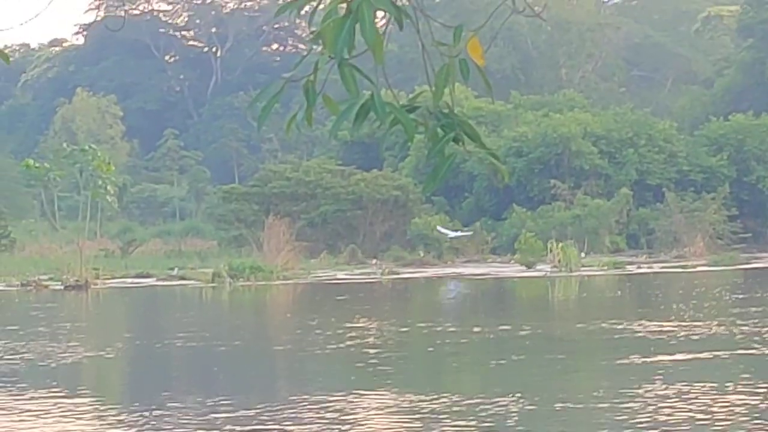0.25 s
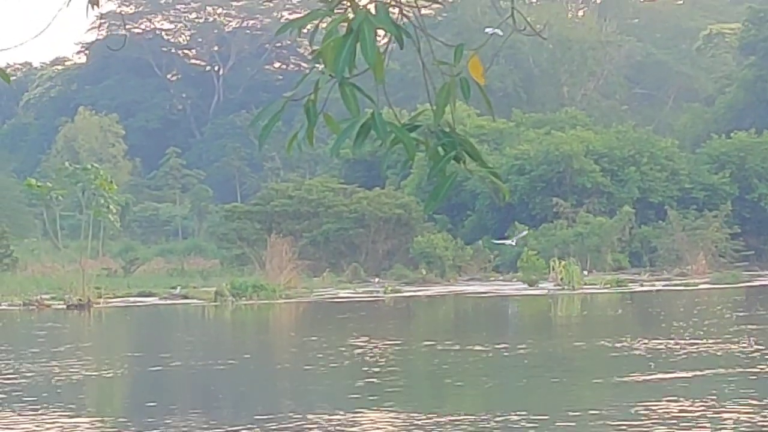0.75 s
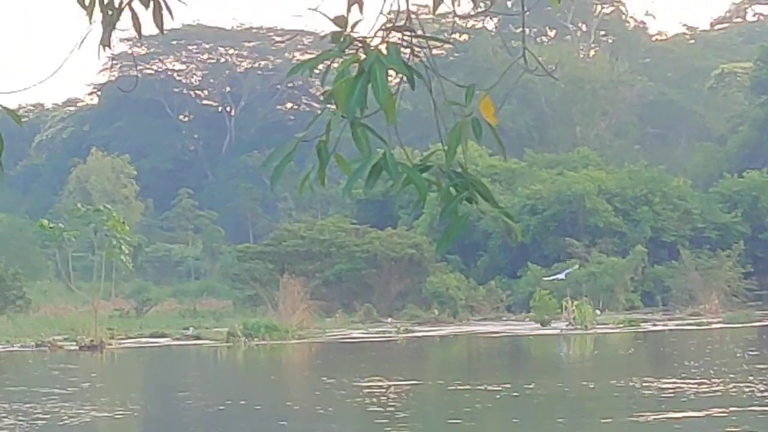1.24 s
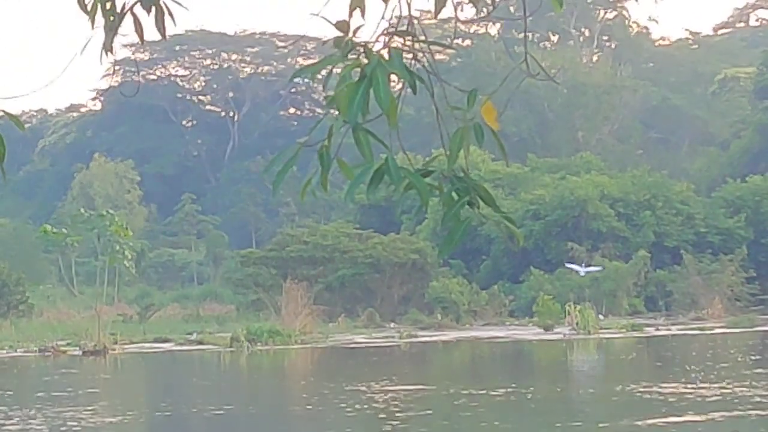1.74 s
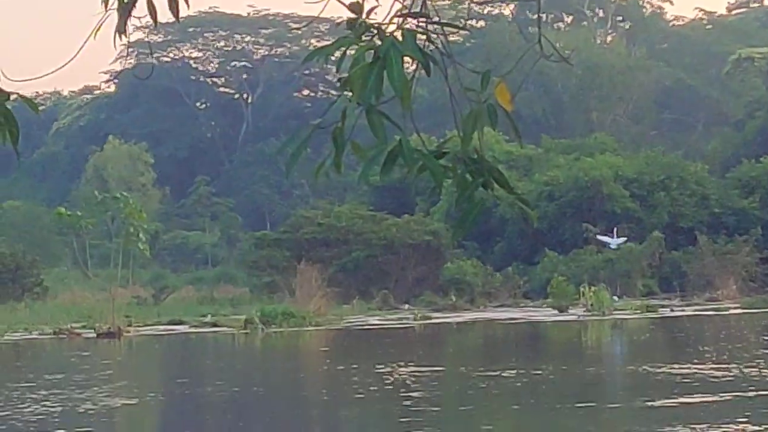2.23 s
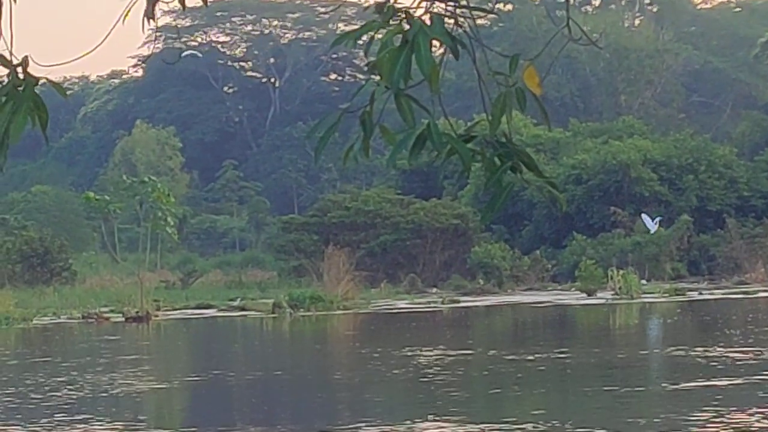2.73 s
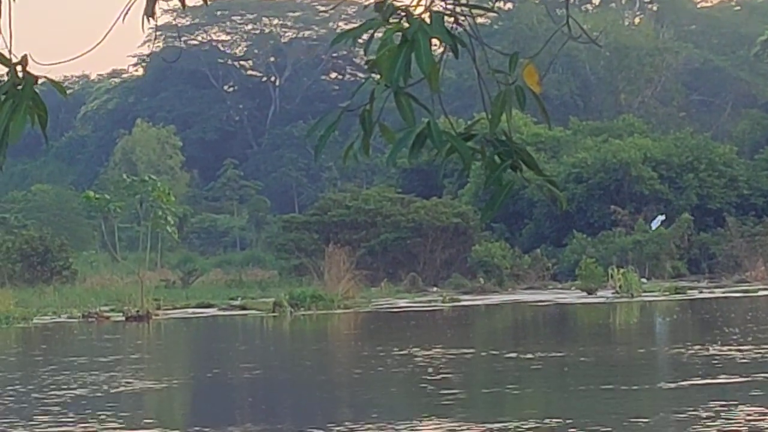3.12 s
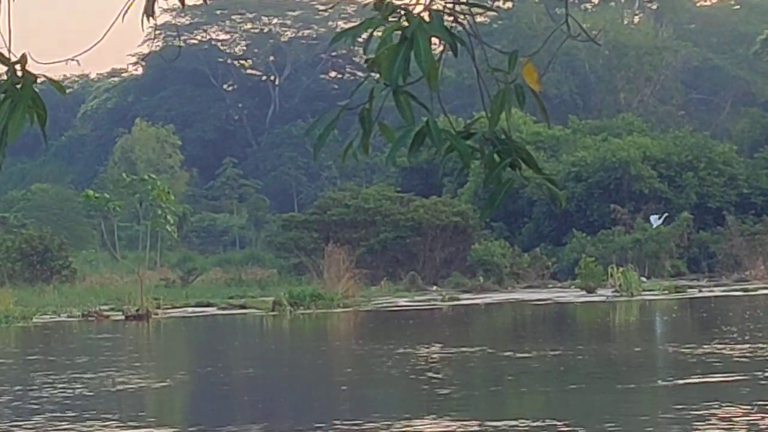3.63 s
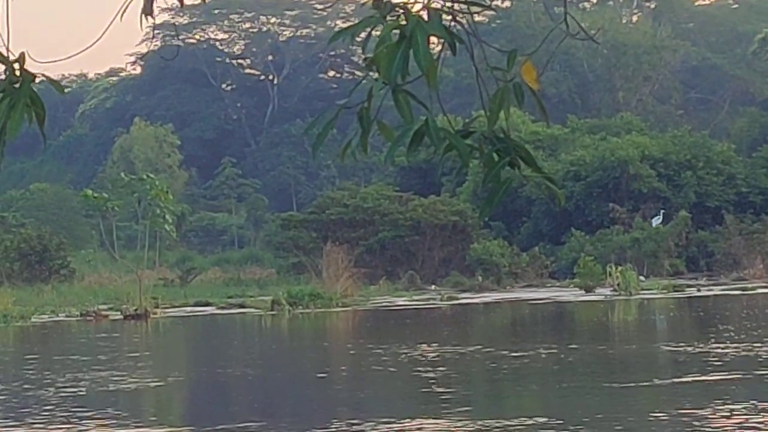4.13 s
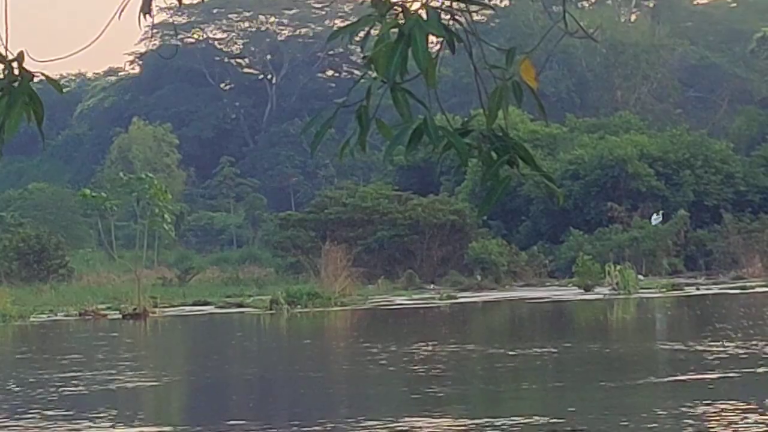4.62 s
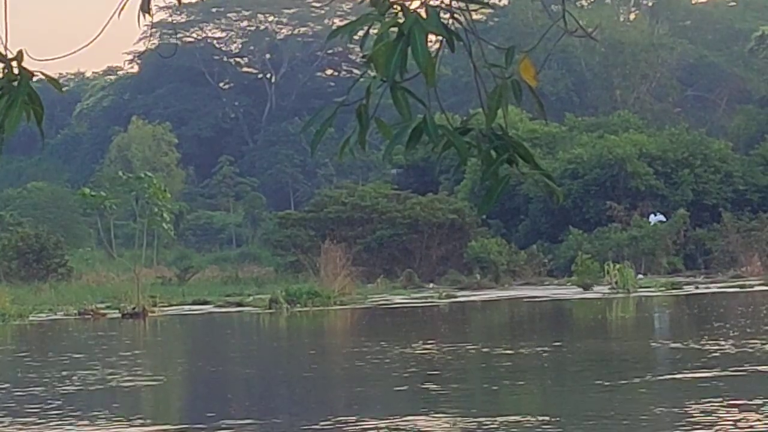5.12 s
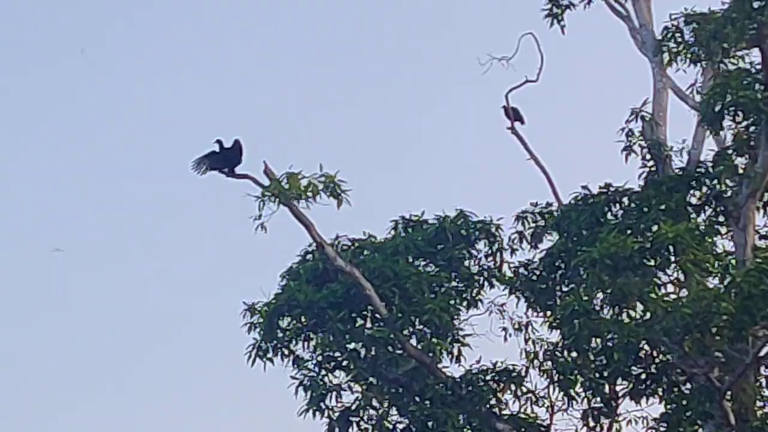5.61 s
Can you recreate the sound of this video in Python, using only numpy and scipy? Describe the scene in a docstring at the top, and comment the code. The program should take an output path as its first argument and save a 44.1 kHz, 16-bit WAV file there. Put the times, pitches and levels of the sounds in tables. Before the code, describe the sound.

Broad, steady river rush with a low rumble fills the stereo picture, under a continuous shrill insect drone. Small birds chip and slur; two clear, long whistles come around two seconds, then a larger bird slurs upward and gives a reedy cry near four. The handheld microphone shifts with a faint rustle midway. Open forested riverbank with lingering echoes; sound cuts off just before the end.

```python
"""A flooded river rushes steadily past a forested bank, with insects droning in the trees. Birds whistle
and chip near and far. Water, insects, hum, chatter and rustle are filtered noise; the other bird calls
are gliding tones, hoots and plops nearly steady ones, all followed by scattered echoes. The microphone
shifts once with a rustle, and its two ports colour the treble differently. The sound cuts to silence
shortly before the end."""
import sys
import numpy as np
from scipy import signal
from scipy.fft import rfft, irfft
from scipy.io import wavfile
from scipy.ndimage import uniform_filter1d, map_coordinates

SR = 44100
rng = np.random.default_rng(int(sys.argv[2]) if len(sys.argv) > 2 else 0)


def transcribe(u):
    """Save the signal u as a 16-bit wav file named by the first command-line argument.

    u: samples, shape (n,) or (channels, n), limited to [-1, 1]; the rate is SR.
    q: integer samples, one column per channel.
    """
    v = np.clip(np.atleast_2d(u).T, -1, 1)
    q = np.round(v * 32767).astype(np.int16)
    wavfile.write(sys.argv[1], SR, q)


N = 258420


def gain_of(db):
    """Amplitude ratio of a level: 20 dB for each factor of ten."""
    return 10 ** (np.asarray(db) / 20)


def evened(x):
    """Normalization to unit root mean square."""
    return x / np.sqrt(np.mean(x ** 2) + 1e-20)


def read(points, hz):
    """Interpolation of a spectrum by straight lines over log frequency."""
    f, value = np.transpose(points)
    return np.interp(np.log(hz + 1), np.log(f + 1), value)


def add(mix, s, sound):
    """Superposition: a sound is summed into the mix from s seconds on."""
    part = mix[round(s * SR):][:len(sound)]
    part += sound[:len(part)]


def white(size=1024):
    """Short-time spectra of two uncorrelated white noises, 0 dB per Hz: f/Hz (column), t/s, spectra."""
    noise = rng.standard_normal((2, N)) * np.sqrt(SR / 2)
    hz, t, z = signal.stft(noise, SR, nperseg=size, noverlap=size - size // 4)
    return hz[:, None], t, z


def sounded(z, size=1024):
    """Overlap-add synthesis: short-time spectra back to sound."""
    return signal.istft(z, nperseg=size, noverlap=size - size // 4)[1][:, :N]


def patches(shape, size):
    """Smoothed random field: blotches of unit size over frequency and time."""
    over_hz = uniform_filter1d(rng.standard_normal(shape), size, 0)
    return evened(uniform_filter1d(over_hz, size, 1))


def wander(n, hz):
    """Band-limited chance: a smooth curve through hz random knots per second, of about unit size."""
    knots = rng.standard_normal(256)
    return map_coordinates(knots, [np.arange(n) * hz / SR], order=3, mode="mirror")


def envelope(t, attack_s, hold_s, fade_db_per_s):
    """Linear rise from t = 0, a hold until hold_s, then exponential decay."""
    fade = gain_of(-fade_db_per_s * np.maximum(t - hold_s, 0))
    return np.clip(t / attack_s, 0, 1) * fade


def whistle(length, pitches, overtones, waver=.003, shake_db=2.0, soft=0.18):
    """Frequency modulation: a tone passes through three pitches; pitch and level tremble at random."""
    n = int(length * SR)
    bend = np.polyfit([0, .5, 1], pitches, 2)
    hz = np.polyval(bend, np.linspace(0, 1, n)) * (1 + waver * wander(n, hz=170))
    phase = 2 * np.pi * np.cumsum(hz) / SR
    tone = sum(gain_of(db) * np.sin(round(k) * phase) for k, db in overtones)
    shake = gain_of(shake_db * wander(n, hz=59.3))
    return np.sqrt(2) * tone * signal.windows.tukey(n, soft) * shake


def forest(x, t60, wet_db, lead_ms):
    """Scattering: direct sound, then sparse echoes from trunks and leaves that lose 60 dB in t60 seconds."""
    t = np.arange(SR) / SR
    taps = rng.standard_normal((2, SR)) * (rng.random((2, SR)) < 2000 / SR)  # 2000 echoes per second
    tail = taps * gain_of(-60 * t / t60) * (1 - np.exp(-t / 0.0066))
    tail /= np.linalg.norm(tail, axis=1, keepdims=True)
    direct = np.array([x, np.roll(x, round(lead_ms * SR / 1000))])  # left port leads
    echoes = signal.fftconvolve(x[None], tail, axes=1)[:, :N]
    wet = gain_of(wet_db)
    return (direct + wet * echoes) / np.sqrt(1 + wet ** 2)


def shifted(t):
    """Linear displacement of the microphone, from 0 to 1, at the times t."""
    shift_s, shift_takes_s = 3.44, 0.28  # middle and duration of the shift
    return np.clip(.5 + (t - shift_s) / shift_takes_s, 0, 1)


def facing(t):
    """Linear interpolation between the microphone's two orientations: each column at the times t."""
    # water before and after the shift: rumble level/dB, rush level/dB, lead of the left port/ms,
    # factor on the likeness of the ports
    orientations = [(-0.5, -0.63, 0.44, 0.89), (-1.65, 0.02, 0.4, 1.106)]
    before, after = np.array(orientations)
    return before[:, None] + (after - before)[:, None] * shifted(t)


def water(patchy_db=1.0, surge_db=0.93, rumble_hz=450):
    """Partly coherent noise: countless splashes merge to rush and rumble, reaching the left port first."""
    # base spectrum of the water: f/Hz, density/(dB per Hz)
    spectrum = [(10, -71), (35, -72), (80, -72.5), (200, -78), (360, -77.5), (650, -82.5), (1000, -82.5),
                (2000, -86.5), (2700, -91.5), (3050, -94.5), (3600, -93), (4300, -92), (5250, -100),
                (7400, -96.5), (9200, -109.5), (15000, -109)]
    # base coherence of the two ports: f/Hz, likeness (0-1)
    likeness = [(20, 0.5), (110, 0.99), (300, 0.96), (600, 0.68), (1200, 0.76), (2100, 0.64), (3000, 0.6),
                (4000, 0.3), (15000, 0.4)]
    ebb_db_per_s = 0.35  # the water slowly grows quieter
    hz, t, (left, other) = white()
    rumble_db, rush_db, lead_ms, focus = facing(t)
    low = 1 / (1 + (hz / rumble_hz) ** 2)  # share of the rumble; the rest is rush
    high = 1 - low

    same = np.clip(read(likeness, hz) * (low + high * focus), 0, 1)
    delay = np.exp(-2j * np.pi * hz * lead_ms / 1000)
    right = same * left * delay + np.sqrt(1 - same ** 2) * other

    surge = evened(uniform_filter1d(rng.standard_normal(len(t)), size=16))
    db = read(spectrum, hz) + low * rumble_db + high * rush_db
    db = db - ebb_db_per_s * (t - t.mean()) + surge_db * surge
    db = db + high * patchy_db * patches(left.shape, size=12)
    return sounded(np.array([left, right]) * gain_of(db))


def songbirds():
    """Pure gliding tones: short whistles and slurs that slide quickly at first, then settle."""
    # thin notes: t/s, length/s, first f/Hz, last f/Hz, relative level/dB at the first pitch
    notes = [ (0.293, .039, 5290, 5290, -47), (1.0, 0.053, 1532, 1765, -60),
             (1.085, 0.066, 5540, 5200, -51.5), (1.138, 0.1, 5100, 2554, -51.5),
             (1.52, .07, 8200, 7850, -64), (1.618, .06, 7590, 7140, -57), (1.668, 0.077, 4420, 3880, -56.5),
             (1.732, 0.062, 1380, 2155, -58.5), (1.785, .22, 2694, 2630, -59.5),
             (2.008, .11, 3220, 2590, -58.5), (2.051, 0.089, 2490, 2200, -62),
             (2.104, 0.081, 2600, 1950, -55), (3.04, 0.068, 1850, 2125, -60),
             (3.058, 0.11, 5360, 5350, -61), (3.069, 0.08, 4600, 4100, -60),
             (3.12, 0.093, 1416, 1886, -63.5), (3.172, 0.39, 3740, 3716, -68.5),
             (5.055, 0.1, 7870, 7630, -62), (5.153, 0.0595, 7370, 6910, -45.5),
             (5.2, 0.053, 7000, 6330, -50.5)]
    ease = .6  # share of its slide that a note has covered at half its length
    db_per_octave = 5  # a note grows as it rises and fades as it falls
    out = np.zeros(N)
    for s, length, first, last, db in notes:
        middle = first + ease * (last - first)
        waver = 0.0014 + 0.03 * abs(np.log(last / first))  # wide slurs are rougher than held notes
        note = whistle(length, (first, middle, last), [(1, 0)], waver=waver, shake_db=2.5, soft=0.27)
        octaves = np.linspace(0, np.log2(last / first), len(note))
        add(out, s, note * gain_of(db + db_per_octave * octaves))
    return gain_of(0.3) * forest(out, t60=1.3, wet_db=-2.0, lead_ms=.07)


def piper(level_db=-1.3, octave_db=-21, waver=0.0042, shake_db=1.4):
    """Exponential glide: long whistles swell as they scoop up, then sag and fade among lingering echoes."""
    # pipes: t/s, swell/s, hold/s, fade/(dB per s), top f/Hz, scoop depth/Hz, scoop time constant/s,
    # relative level/dB
    pipes = [(1.805, .05, 0.19, 65.5, 4169, 231.7, .1, -47), (2.388, 0.035, 0.2, 42, 4062, 229, .02, -48.5)]
    sag_hz_per_s = 50
    out, t = np.zeros(N), np.arange(SR) / SR
    for s, swell, hold, fade, top_hz, scoop_hz, scoop_s, db in pipes:
        hz = top_hz - scoop_hz * np.exp(-t / scoop_s) - sag_hz_per_s * t
        phase = 2 * np.pi * np.cumsum(hz * (1 + waver * wander(SR, hz=150.6))) / SR
        tone = np.sqrt(2) * (np.sin(phase) + gain_of(octave_db) * np.sin(2 * phase))
        rise = np.sqrt(np.clip(t / swell, 0, 1))
        decay = gain_of(-fade * np.maximum(t - hold, 0))
        loudness = rise * decay * signal.windows.tukey(SR, .03)
        shake = shake_db * wander(SR, hz=45)
        add(out, s, tone * loudness * gain_of(db + shake))
    return gain_of(level_db) * forest(out, t60=1.3, wet_db=0.5, lead_ms=.1)


def crier(waver=.0016, shake_db=1.0, right_db=1.8):
    """Harmonic synthesis: a larger bird to the right slurs upward twice, then gives a long reedy cry."""
    # soft slurs that lead into the cry: t/s, length/s, first f/Hz, middle f/Hz, last f/Hz, relative level/dB
    slurs = [(3.199, .19, 1920, 2167, 2230, -52), (3.378, 0.096, 1950, 2120, 2340, -54.5)]
    # course of the cry: t/s, f/Hz, relative level/dB, brightness/(dB per octave)
    long_cry = [(3.55, 2122, -63.5, -5), (3.62, 2195, -57.5, 7), (3.655, 2213, -50, -5),
                (3.7, 2288, -57, -4.5), (3.735, 2360, -57.5, 5.5), (3.768, 2417, -63.5, 3),
                (3.778, 2333, -52, -12), (3.79, 2320, -45.5, -8), (3.81, 2394, -51, 4),
                (3.83, 2408, -53.5, 3), (3.87, 2402, -41, -6.5), (3.955, 2394, -47.5, -1),
                (3.985, 2377, -55.5, 1.5), (4.005, 2396, -43.5, -13), (4.035, 2394, -41.5, -4),
                (4.07, 2380, -60, -7)]
    # overtones of the cry: multiple of the pitch, relative level/dB
    reed = [(1, -5), (2, -6.5), (3, -9.5), (4, -24), (5, -28)]
    out = np.zeros(N)
    for s, length, first, middle, last, db in slurs:
        slur = whistle(length, (first, middle, last), [(1, -1), (2, -21)],
                       waver=0.0056, shake_db=1.0, soft=0.34)
        add(out, s, gain_of(db) * slur)

    times, *controls = np.transpose(long_cry)
    t = np.arange(times[0], times[-1], 1 / SR)
    hz, db, bright_db = (np.interp(t, times, control) for control in controls)
    phase = 2 * np.pi * np.cumsum(hz * (1 + waver * wander(len(t), hz=119.5))) / SR
    tone = np.zeros(len(t))
    for k, level in reed:
        shake = shake_db * wander(len(t), hz=69.6)  # each overtone trembles by itself
        tone += np.sin(round(k) * phase) * gain_of(level + bright_db * np.log2(k) + shake)
    cry = np.sqrt(2) * tone * gain_of(db) * signal.windows.tukey(len(t), .03)
    add(out, times[0], cry)
    return gain_of([[-right_db], [right_db]]) * forest(out, t60=1.05, wet_db=-5.5, lead_ms=0)


def chipper(length=0.029, top_hz=7700, middle_hz=7100, bottom_hz=6600, rasp_hz=1100):
    """Amplitude modulation: a small bird's quick downward flicks are widened in pitch by a random rasp."""
    # sharp chips: t/s, relative level/dB
    chips = [(1.99, -48), (2.17, -58), (2.33, -58), (2.88, -54.5), (3.21, -56.5), (4.145, -50.5),
             (4.364, -62), (4.69, -53), (5.004, -51.5)]
    out = np.zeros(N)
    for s, db in chips:
        flick = whistle(length, (top_hz, middle_hz, bottom_hz), [(1, 0)], waver=.01, soft=0.58)
        rasp = evened(wander(len(flick), hz=rasp_hz))
        add(out, s, gain_of(db) * flick * rasp)
    return gain_of(-0.5) * forest(out, t60=0.28, wet_db=-0.5, lead_ms=0)


def chatter(low_hz=3400, high_hz=4600, width_hz=260, ragged_db=3):
    """Source and filter: a hoarse bird far off is ragged noise shaped by two throat resonances."""
    # bursts: t/s, hold/s, base density/(dB per Hz)
    chatters = [(.38, .08, -90.5), (2.7, .07, -91.5), (3.81, .12, -91.5), (4.119, 0.25, -91.5)]
    hz, t, z = white()
    bursts = np.zeros(len(t))
    for s, hold, db in chatters:
        bursts += gain_of(db) * envelope(t - s, attack_s=0.034, hold_s=hold, fade_db_per_s=70.0)
    low_throat = np.exp(-((hz - low_hz) / width_hz) ** 2 / 2)
    high_throat = np.exp(-((hz - high_hz) / (2 * width_hz)) ** 2 / 2)  # twice as wide
    ragged = gain_of(ragged_db * patches(z[0].shape, size=6))
    return sounded(z * (low_throat + high_throat) * bursts * ragged)


def insects(flutter_db=1.14, skirt=3):
    """Incoherent sum: many singers around each pitch blur to shrill bands that flutter and slowly throb."""
    # choruses: f/Hz, half width/Hz, base density/(dB per Hz), throb depth/dB, gain after the shift/dB
    choruses = [(4795, 109, -81.5, 3, 2), (5950, 259, -81, 0, 2), (7050, 210, -92, 0.5, 1.5)]
    throb_every_s, throb_peak_s = 1.33, 2.695
    hz, t, z = white()
    throb = np.cos(2 * np.pi * (t - throb_peak_s) / throb_every_s)
    power = np.zeros(z[0].shape)
    for f, width, db, throb_db, shift_db in choruses:
        band = 1 / (1 + ((hz - f) / width) ** 2 / (2 * skirt)) ** (skirt + 1)
        power += gain_of(db + throb_db * throb + shift_db * shifted(t)) ** 2 * band
    flutter = gain_of(flutter_db * patches(z[0].shape, size=6))
    return sounded(z * np.sqrt(power) * flutter)


def rustle(start_s=3.49, level_db=-106, lowest_hz=5000, ragged_db=3):
    """High-passed noise: a thin, ragged brush as the microphone shifts."""
    hz, t, z = white()
    brush = envelope(t - start_s, attack_s=.06, hold_s=.12, fade_db_per_s=161)
    bright = hz ** 2 / (hz ** 2 + lowest_hz ** 2)
    ragged = gain_of(level_db + ragged_db * patches(z[0].shape, size=4))
    return sounded(z * bright * brush * ragged)


def plops(length=.035, hz=242):
    """Short tone bursts: two soft, low plops with weak echoes."""
    # plops: t/s, relative level/dB
    bursts = [(3.551, -49), (3.594, -47.5)]
    out = np.zeros(N)
    for s, db in bursts:
        plop = whistle(length, (hz, hz, hz), [(1, 0)], waver=.012, shake_db=4.0, soft=0.46)
        add(out, s, gain_of(db) * plop)
    return forest(out, t60=0.23, wet_db=-7.0, lead_ms=.2)


def hoots(waver=0.0087, shake_db=1.5):
    """Two-partial tones: dull, nearly steady hoots with an octave barely rise out of the rumble."""
    # hoots: t/s, length/s, f/Hz, relative level/dB, octave level/dB relative to the fundamental
    calls = [(0, 0.19, 370.5, -55, -20), (.02, 0.38, 160, -52.5, -16.5), (0.269, 0.34, 376, -59.5, -23),
             (0.403, 0.25, 327, -56.5, -16), (0.658, 0.39, 331.4, -53, -12.5),
             (1.064, 0.28, 336, -62.5, -1.5), (2.5, 0.36, 362, -60.5, -16)]
    out = np.zeros(N)
    for s, length, hz, db, octave_db in calls:
        hoot = whistle(length, (hz, hz, hz), [(1, 0), (2, octave_db)],
                       waver=waver, shake_db=shake_db, soft=0.27)
        add(out, s, gain_of(db) * hoot)
    return forest(out, t60=0.32, wet_db=-9.5, lead_ms=.2)


def hum():
    """Narrow-band noise: wavering bass, alike at both ports, that dips, returns and fades again."""
    # bands of the far hum: f/Hz, half width/Hz, base density/(dB per Hz)
    bands = [(74, 2.9, -67.5), (114, 11, -74.5)]
    # course of the hum: t/s, relative level/dB
    course = [(0, 2), (3.3, -0.5), (3.75, -8), (4.3, 1.5), (4.85, -10)]
    hz = np.fft.rfftfreq(N, 1 / SR)
    shape = sum(gain_of(db) / (1 + ((hz - f) / width) ** 2) for f, width, db in bands)
    noise = rng.standard_normal(N) * np.sqrt(SR / 2)
    hum_db = np.interp(np.arange(N) / SR, *np.transpose(course))
    return gain_of(hum_db) * irfft(rfft(noise) * shape, N)


def scene():
    """Superposition of water, birds, insects and the fainter sounds."""
    birds = songbirds() + piper() + crier() + chipper() + chatter()
    return water() + birds + insects() + rustle() + plops() + hoots() + hum()


def record(dry):
    """Linear filtering: each port favours its own part of the treble; then the abrupt stop and band limit."""
    # level difference of the ports: f/Hz, left minus right/dB
    port_balance = [(100, -0.5), (350, 0.5), (600, -2), (1200, 1.5), (2200, 2), (3300, -1.5), (4200, 5.5),
                    (4850, 7), (5500, 1), (6250, -10.5), (6650, -21), (7400, -21), (8000, -11), (10000, -2)]
    stop_s, edge_hz = 5.338, 15500
    ratio = gain_of(read(port_balance, np.fft.rfftfreq(N, 1 / SR)))
    # the summed power of the two gains is the same at every frequency
    gains = np.array([ratio, np.ones_like(ratio)]) * np.sqrt(2 / (1 + ratio ** 2))
    heard = irfft(rfft(dry) * gains, N)
    heard = heard * np.clip((stop_s - np.arange(N) / SR) / .003, 0, 1)  # 3 ms ramp to silence
    low_pass = signal.firwin(511, edge_hz, window=("kaiser", 9), fs=SR)
    return signal.oaconvolve(heard, low_pass[None], "same")


dry = scene()
out = record(dry)
transcribe(out)
```